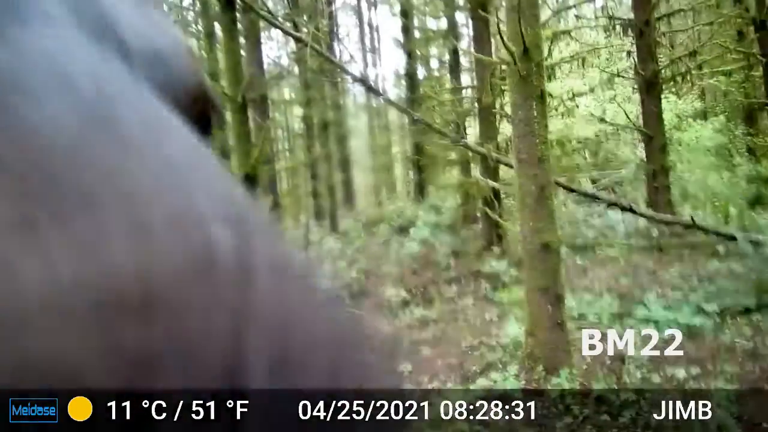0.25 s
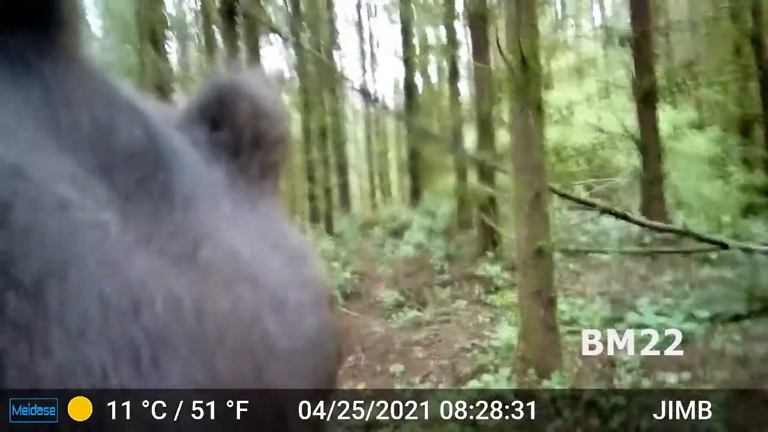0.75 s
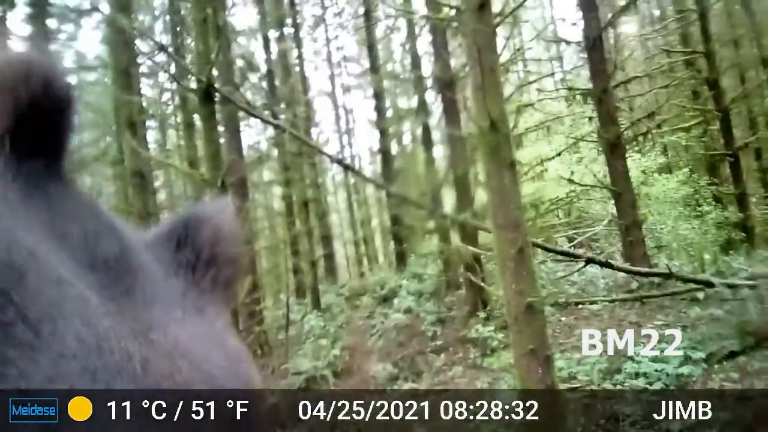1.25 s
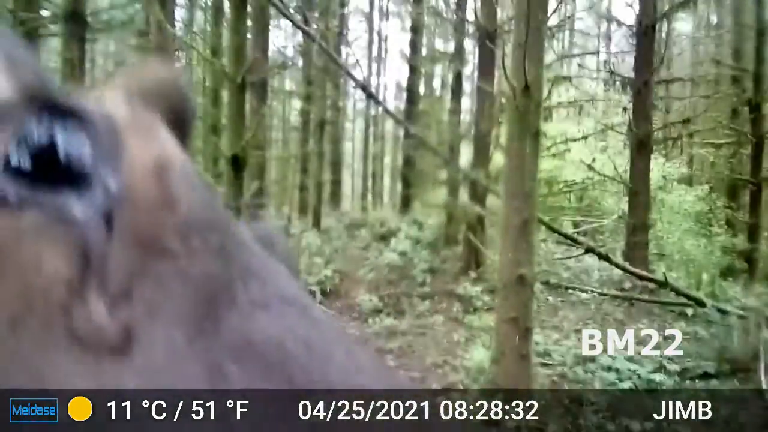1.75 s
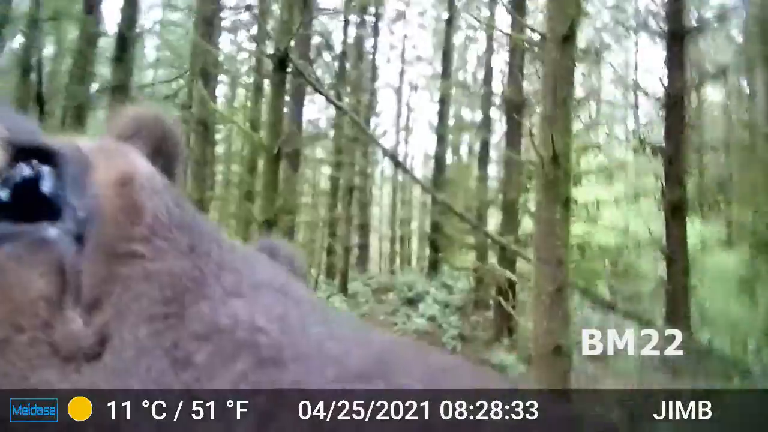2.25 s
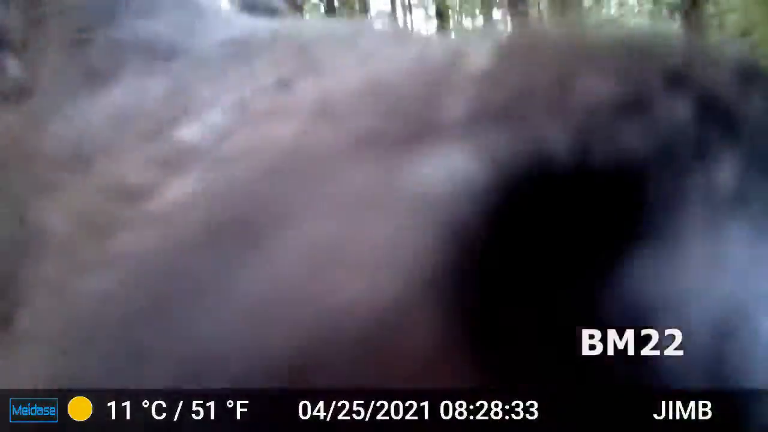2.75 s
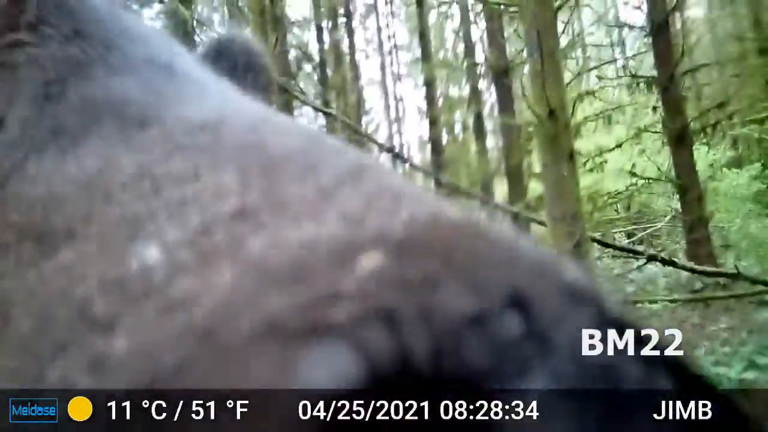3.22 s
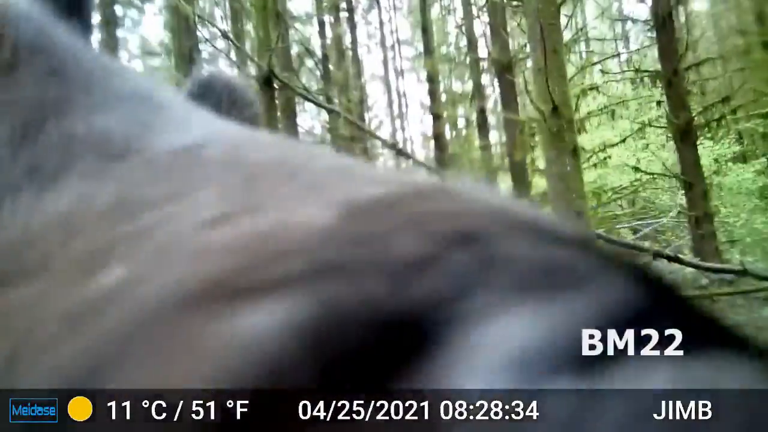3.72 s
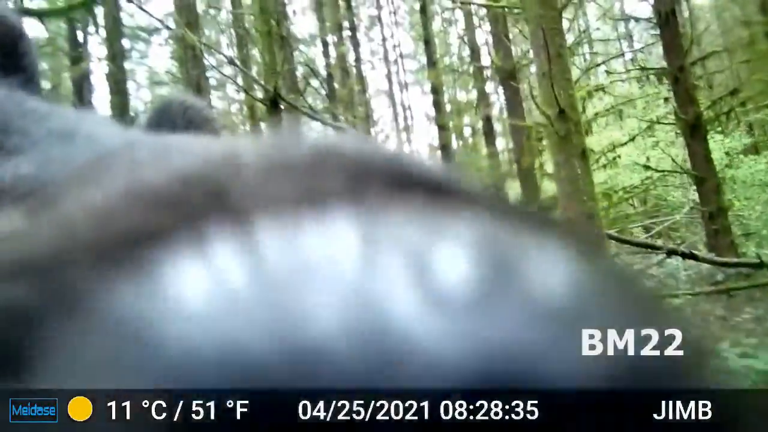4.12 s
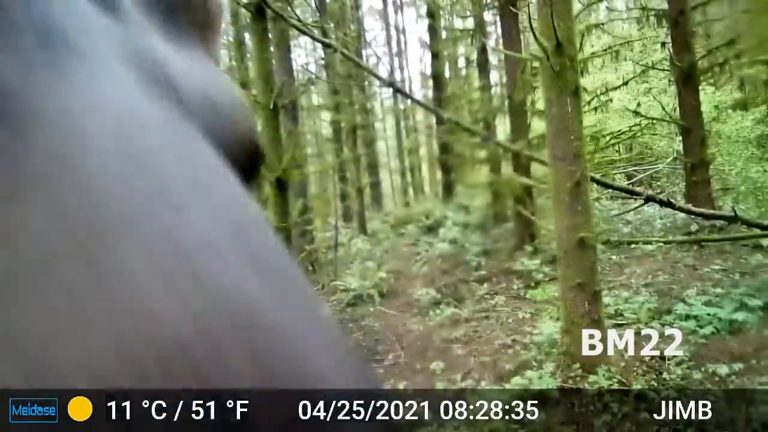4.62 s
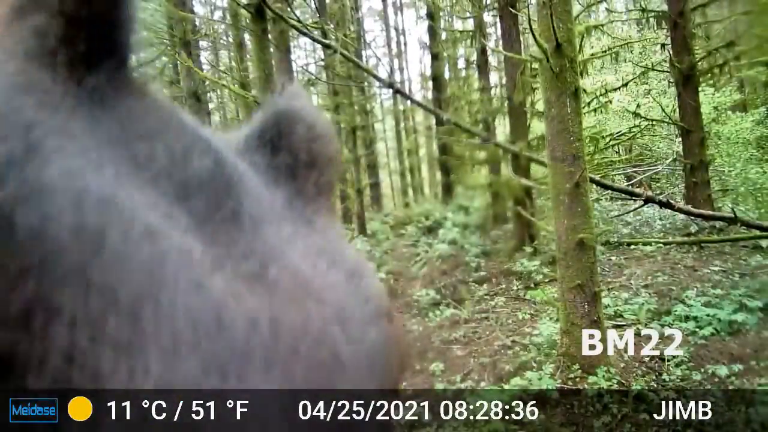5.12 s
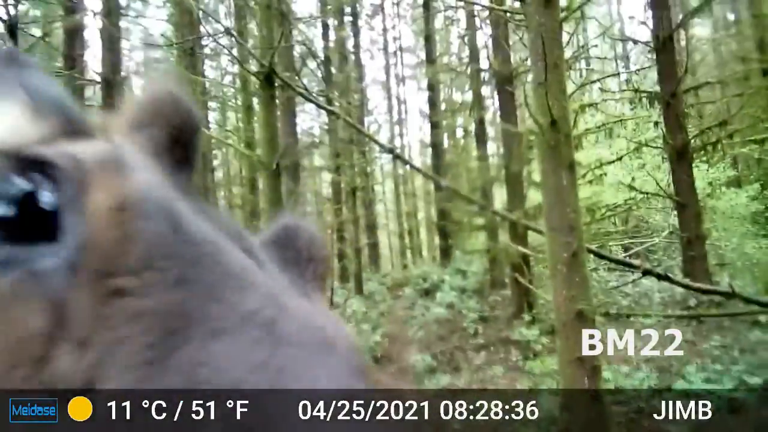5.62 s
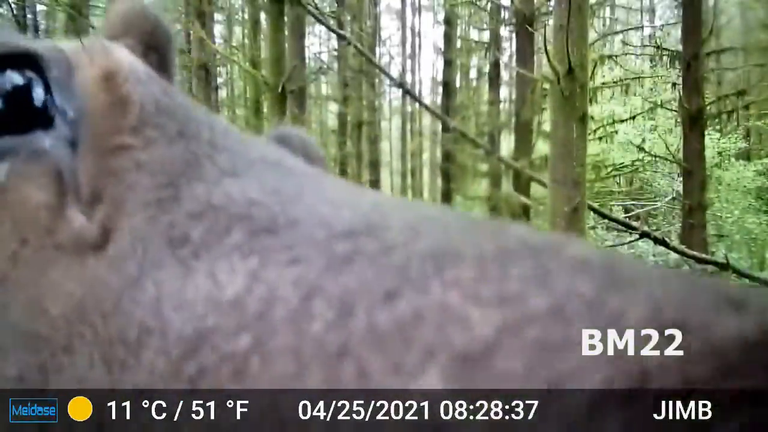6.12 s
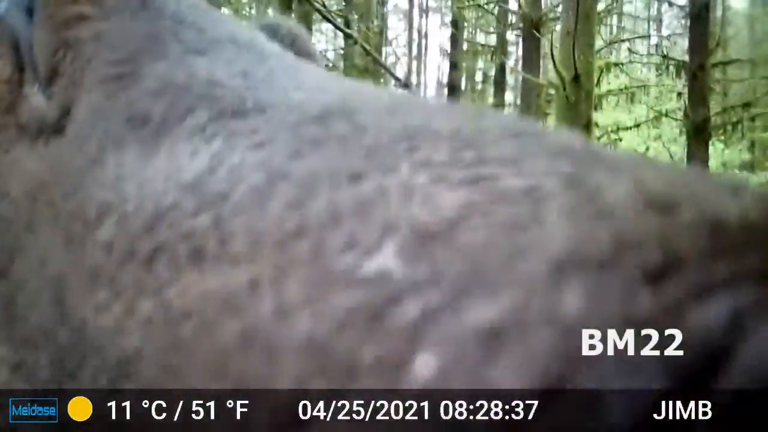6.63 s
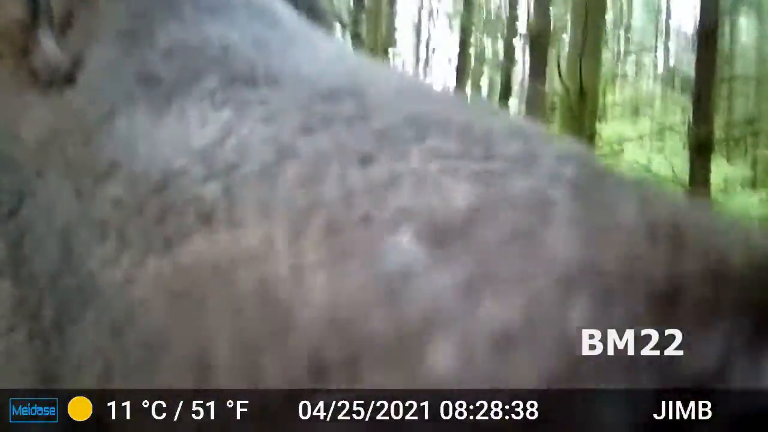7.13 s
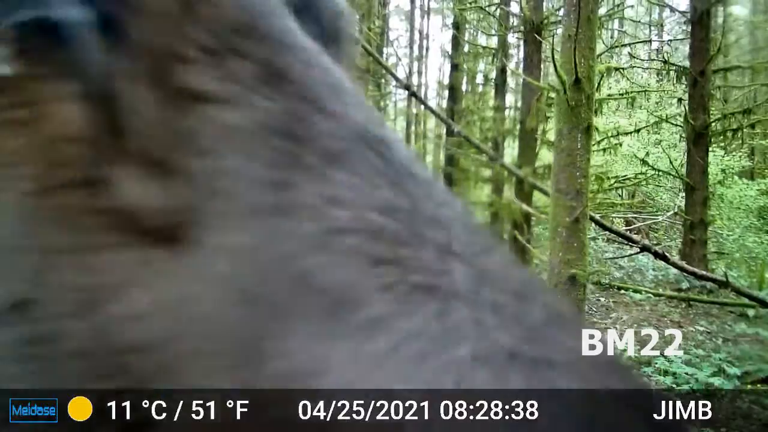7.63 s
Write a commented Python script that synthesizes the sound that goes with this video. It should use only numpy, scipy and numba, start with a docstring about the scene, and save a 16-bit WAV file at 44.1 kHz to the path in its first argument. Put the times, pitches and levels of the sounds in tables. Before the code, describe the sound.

Very close, dry contact noise in a quiet forest, as an elk rubs a plastic case. At 0 s a low thump and tiny puff, then a scrape with a short rising squeak around 0.1 s. Light fur strokes follow, with a double bump near 0.6 s and fuller hissing from 1.05 s. A brief squeak at 1.45 s leads to knocks, catches and clicks through 2.5 s. From 2.5 to 3.1 s, abrupt muzzle gusts roar and overload the microphone. Juddering scuffs, bumps and plastic ticks crowd 3.2-4.3 s. It thins, then dry bristly rubbing runs 5.2-5.7 s, ending in a thud and clicks. More thumps, rasps and ticks come from 6.1 to 7.1 s, heaviest near 6.4 and 6.9, with faint airy gusting behind and a thin bright whisk or two. After 7.2 s almost only faint forest air remains.

```python
"""A low thump and a puff of air, then an elk rubs its head on a trail camera in a quiet forest.
Fur hisses in strokes of dense hair clicks ringing the housing; fur catches judder and damp skin squeaks.
Muzzle gusts are noise under a moving corner; the dragged case rumbles, bumps rock it, its mount clicks.
Rare swishes are narrow bright hiss. Microphone and preamp saturate on the hard contacts.
"""
import sys
import numpy as np
from scipy import signal
from scipy.fft import rfft, irfft, next_fast_len
from scipy.io import wavfile
from scipy.ndimage import uniform_filter1d
from numba import njit

SR = 44100
rng = np.random.default_rng(int(sys.argv[2]) if len(sys.argv) > 2 else 0)


def master_out(mix):
    """Clip the mix to full scale and print it as 16-bit PCM to the path in sys.argv[1]."""
    frames = np.transpose(np.atleast_2d(mix))
    ceiling = np.clip(frames, -1, 1)
    pcm = np.round(ceiling * 32767).astype(np.int16)
    wavfile.write(sys.argv[1], SR, pcm)


N = 347067
TIME = np.arange(N) / SR  # s

# All table levels are relative.
# faint forest air, spectrum: freq_hz, level_db
FOREST_SPECTRUM = [(45, 8), (110, -7), (300, -18), (1000, -24.5), (2000, -31), (5000, -30), (8000, -42)]
FOREST_DB = -46.5
# rumble of the case on its strap, spectrum: freq_hz, level_db
SWAY_SPECTRUM = [(14, -16), (32, 4), (88, 3.5), (125, -4), (180, -19.5), (420, -63)]
# head leans on the case and shifts it: start_s, length_s, rumble_db
SHOVES = [(0.0, 0.018, -0.5), (0.663, 0.3, -27.5), (1.51, 0.16, -23.5), (2.148, 0.077, -18),
          (3.378, 0.04, -10.5), (4.146, 0.073, -17), (4.293, 0.075, -12), (4.745, 0.38, -30.5),
          (5.645, 0.14, -19.5), (6.367, 0.12, -19.5), (6.878, 0.049, -11)]
SHOVE_ATTACK_S, SHOVE_RELEASE_S = 0.003, 0.023
DRAG_DB, DRAG_GROWTH = -15, 0.48  # rumble under a stroke of gain 1; dB of rumble per dB of hiss
# muzzle gusts on the microphone port: start_s, length_s, level_db, base_corner_hz
GUSTS = [(0.006, 0.018, 1, 380), (2.532, 0.054, 9, 674), (2.639, 0.016, 6, 707), (2.666, 0.022, 3, 617),
         (2.707, 0.053, -4.5, 576), (2.758, 0.18, -9.5, 327.5), (2.877, 0.033, -6.5, 621),
         (2.958, 0.049, -8, 800), (3.023, 0.047, -6.5, 240), (3.09, 0.059, -3, 180),
         (6.402, 0.44, -29.5, 1148)]
GUST_ATTACK_S, GUST_RELEASE_S = 0.0015, 0.006
GUST_SAG_DB = -6
# coarse fur catches and judders: start_s, length_s, body_db, rasp_db
CATCHES = [(0.034, 0.01, -3, -15), (0.14, 0.0099, -36.5, -23), (0.612, 0.0081, -11, -24.5),
           (1.041, 0.016, -24, -44), (1.581, 0.029, -5.5, -14), (1.843, 0.0031, -9, -14),
           (1.939, 0.0089, -13, -22), (2.049, 0.0072, -19, -22.5), (2.179, 0.009, -8, -9),
           (2.201, 0.006, -11, -14), (2.22, 0.008, -18, -21), (2.446, 0.011, -3.5, -7.5),
           (2.479, 0.014, -25, -26.5), (2.513, 0.005, -3.5, -24.5), (2.841, 0.033, -15, -23.5),
           (3.159, 0.012, -13.5, -15), (3.215, 0.0071, -6, -15.5), (3.379, 0.027, -17.5, -61),
           (3.417, 0.021, -23, -25), (3.649, 0.0093, -21, -32.5), (3.706, 0.055, -19, -26),
           (3.885, 0.014, -27, -37), (3.958, 0.0098, -10, -45), (4.027, 0.005, -9.5, -35),
           (4.066, 0.0027, -4.5, -21), (4.138, 0.008, -2.5, -10), (4.204, 0.006, -14.5, -18),
           (4.311, 0.017, -20, -24.5), (5.651, 0.012, -16, -28), (5.689, 0.0094, -19.5, -30),
           (5.741, 0.017, -22, -43), (6.286, 0.0081, -6, -11), (6.344, 0.012, -12.5, -12.5),
           (6.411, 0.028, -14, -19.5), (6.711, 0.027, -15.5, -22.5), (6.86, 0.037, -1, -7),
           (6.908, 0.016, 2.5, -10)]
# damp skin squeaks on the plastic, one glide each: time_s, mean_pitch_hz, level_db
SQUEAKS = [
    [(.037, 1072, -39), (.062, 1109, -23), (.072, 1129, -8), (.093, 1043, -5.5), (.099, 1452, -22),
     (.127, 1614, -12)],
    [(1.434, 1103, -12), (1.446, 1095, -18.5), (1.456, 2235, -13.5), (1.474, 2880, -24)],
]
# strokes of fur over the case: start_s, length_s, hiss_and_sheen_db, swell_start_to_end_db,
# body_re_hiss_and_sheen_db, sheen_re_hiss_db
STROKES = [(0.045, 0.14, -28, -10.5, 4, 1), (0.353, 0.1, -33, 7, -3.5, 0),
           (0.645, 0.06, -35, -6.5, 4, -3.5), (0.867, 0.12, -37.5, 5, -2.5, 0.5),
           (1.053, .25, -25.5, 6, -3.5, -3), (1.337, 0.22, -29.5, 2, -2.5, -0.5),
           (1.644, 0.19, -54, -21.5, 3.5, 3), (1.846, 0.14, -40, 0.5, 4, 1), (2.085, 0.086, -35, 7, 4, 10),
           (2.175, 0.31, -30.5, -3.5, 1.5, 2.5), (2.562, 0.48, -40, -23, 3, -2.5),
           (3.197, 0.27, -33, 3, 1.5, 4.5), (3.492, 0.11, -33, 10.5, 3, -4),
           (3.662, 0.27, -39.5, -6.5, 6.5, 4), (4.059, 0.12, -30, 3, 7.5, -4),
           (4.235, 0.15, -27.5, 1.5, -3.5, 10), (4.416, 0.087, -35.5, -3.5, -3, 7),
           (4.527, 0.028, -37.5, 6.5, -2.5, -3), (4.827, 0.059, -29.5, 4.5, -1, -1),
           (4.922, 0.073, -44, 5, -6.5, 6), (5.027, 0.0096, -35, 0.5, -9, 6),
           (5.193, 0.21, -31, -3.5, -7, -2.5), (5.311, 0.13, -25, -0.5, -7, 4),
           (5.471, 0.27, -29.5, -1, -5, 2.5), (5.806, 0.17, -36.5, 5, -2, 5), (6.073, 0.04, -42, 4, 5, -3),
           (6.172, 0.19, -33.5, 1, 1.5, 4.5), (6.396, 0.315, -28.5, -7, 1.5, -4.5),
           (6.744, .19, -30.5, 6.5, 2.5, -6), (6.994, 0.084, -34, -1, 8.5, -11),
           (7.148, 0.07, -32.5, -9.5, -1.5, 6), (7.386, 0.086, -52, -2, 3, 0.5)]
STROKE_ATTACK_S, STROKE_RELEASE_S = 0.019, 0.014
# head bumps the case: start_s, level_db
BUMPS = [(0.604, -0.5), (0.646, -8), (1.027, -7.5), (1.582, -0.5), (1.931, 2.5), (2.192, -6.5), (3.21, 0.5),
         (3.575, -6.5), (4.146, 1.5), (4.204, 0), (4.298, -14), (5.64, 2.5), (5.656, -13), (6.089, -13),
         (6.241, -18), (6.394, 6.5), (6.727, -7), (7.047, -8.5)]
# case clicks against its mount: start_s, level_db
TICKS = [(1.845, -2), (2.2207, -4), (2.366, -29), (2.513, 6), (2.846, 4), (3.377, 0.5), (4.137, 8),
         (4.206, -4.5), (5.658, -9), (5.674, -7), (5.6845, 5), (5.809, -21), (7.057, -15), (6.0815, 1.5),
         (6.292, -6.5), (6.715, 6)]
# fine hair whisks past the port: start_s, length_s, level_db
SWISHES = [(3.722, 0.035, -21), (6.821, .035, -27.5), (7.161, 0.051, -20.5)]
# resonances of the housing and its port: mean_centre_hz, width_hz, mean_level_db
HOUSING_MODES = [(425, 78, 0.5), (690, 190, 5.5), (1024, 140, 10.5), (2175, 270, 8.5), (2815, 310, 3.5),
                 (3180, 250, 12), (4746, 230, 10.5)]
TOP_HZ = 7900


def undb(db):
    """Decibels to gain."""
    return 10 ** (np.asarray(db) / 20)


def unit(x):
    """Scale to rms 1."""
    return x / np.sqrt(np.mean(x ** 2) + 1e-18)


def curves(table):
    """Table columns after the first, joined by straight lines in time."""
    times_s, *columns = np.transpose(table)
    return [np.interp(TIME, times_s, column) for column in columns]


def add(out, start_s, x):
    """Mix x into out at start_s."""
    i = max(int(start_s * SR), 0)
    out[i:i + len(x)] += x[:N - i]


def band(x, hz, kind, order=2):
    """Causal low-, high- or band-pass."""
    sos = signal.butter(order, hz, kind, fs=SR, output="sos")
    return signal.sosfilt(sos, x + 1e-18)


def split(x, hz):
    """Zero-phase low part and its remainder; they sum to the whole."""
    low = signal.sosfiltfilt(signal.butter(3, hz, fs=SR, output="sos"), x)
    return low, x - low


def noise(spectrum):
    """Gaussian noise of rms 1, shaped to freq_hz, level_db points."""
    freq_hz, level_db = np.transpose(spectrum)
    size = next_fast_len(N)
    bins_hz = np.fft.rfftfreq(size, 1 / SR)
    gain = undb(np.interp(np.log(bins_hz + 1), np.log(freq_hz), level_db))
    return unit(irfft(rfft(rng.standard_normal(size)) * gain, size)[:N])


def walk(rate_hz):
    """Random line of rms about 1, a new target rate_hz times a second."""
    targets = rng.standard_normal(N // 10)
    return np.interp(TIME * rate_hz, np.arange(len(targets)), targets) * np.sqrt(3 / 2)


@njit
def sweep(x, hz, damping):
    """State-variable filter whose corner moves every sample: rows low-pass and band-pass."""
    y, b, l = np.empty((2, len(x))), 0., 0.
    for i in range(len(x)):
        g = np.tan(np.pi * hz[i] / SR)
        v = (b + g * (x[i] - l)) / (1 + g * (g + damping))
        y[0, i], y[1, i] = l + g * v, damping * v
        b, l = 2 * v - b, l + 2 * g * v
    return y


def contact(start_s, length_s, attack_s, release_s, swell_db=0):
    """Gain of one touch: grows until start_s, holds while swelling or sagging, then dies away."""
    before = np.maximum(start_s - TIME, 0) / attack_s
    after = np.maximum(TIME - start_s - length_s, 0) / release_s
    progress = np.clip((TIME - start_s) / length_s, 0, 1) - .5
    return np.exp(swell_db * progress * np.log(10) / 20 - np.minimum(before + after, 20))


def hairs(rate_hz, spread_db):
    """Hairs flicking off an edge: random clicks; positive spread_db makes a few much larger."""
    flicks = rng.random(N) < rate_hz / SR
    size_db = spread_db * np.minimum(rng.exponential(size=N), 5)
    return unit(flicks * rng.standard_normal(N) * undb(size_db))


def housing(x, direct, shift_db):
    """Case modes ring, their shares and tuning drifting as the contact travels; some sound goes direct."""
    out = direct * x
    for hz, width_hz, db in HOUSING_MODES:
        centre_hz = hz * (1 + .018 * walk(17))
        share = undb(db + shift_db * walk(13))
        out = out + share * sweep(x + 1e-18, centre_hz, width_hz / hz)[1]
    # reflection off the hide across a changing gap: moving notches
    lag_samples = .0006 * SR * np.exp(.3 * walk(9))
    reflection = np.interp(np.arange(N) - lag_samples, np.arange(N), out)
    return out + .4 * reflection


def forest_air():
    """Faint steady air of the forest: shaped noise."""
    return undb(FOREST_DB) * noise(FOREST_SPECTRUM)


def dragging(friction, lurch_db=0.5):
    """Skin drags the case on its strap in small lurches: a rumble under strokes, plus leaning shoves."""
    power = (undb(DRAG_DB) * friction ** DRAG_GROWTH) ** 2
    for start_s, length_s, db in SHOVES:
        shove = undb(db) * contact(start_s, length_s, SHOVE_ATTACK_S, SHOVE_RELEASE_S)
        power = power + shove ** 2
    rumble = unit(noise(SWAY_SPECTRUM) * undb(lurch_db * walk(16)))
    return np.sqrt(power) * rumble


def air(gust_db=0.0, damping=1.0, reach=1.42, port_hz=70, flick_db=-26, flick_hz=550):
    """Eddies hit the port in abrupt gusts; each surge of flow raises level and noise corner together."""
    flows = [undb(db) * contact(start_s, length_s, GUST_ATTACK_S, GUST_RELEASE_S, GUST_SAG_DB)
             for start_s, length_s, db, _ in GUSTS]
    flow = sum(flows)
    corner_hz = sum(f * hz for f, (*_, hz) in zip(flows, GUSTS)) / flow
    surge = np.clip(walk(130), -2, 1.5)
    corner_hz = np.minimum(corner_hz * np.exp(.22 * surge), SR / 16)
    eddies = sweep(rng.standard_normal(N), corner_hz * reach, damping)[0]
    eddies = sweep(eddies, corner_hz, 2.6)[0]
    roar = unit(band(eddies / np.sqrt(corner_hz), port_hz, "highpass"))
    # whiskers scrape the case, hardly at all where the corner is low
    scrape = housing(hairs(rate_hz=2500, spread_db=2), direct=1, shift_db=2)
    whiskers = unit(band(scrape, [600, 7000], "bandpass"))
    flicks = undb(flick_db) * np.minimum(corner_hz / flick_hz, 1) ** 4
    # the flow dips briefly as the lip covers the port
    lip_db = -7 * np.maximum(walk(90), 0) ** 2
    flutter = undb(3.5 * surge + lip_db + 2)
    return (roar + flicks * whiskers) * flow * flutter * undb(gust_db)


def catches(release_s=0.0039, body_db=2.0, rasp_db=4.5, snap=5):
    """Stick and slip: a catch lets go with a snap and judders in uneven jerks, each dragging hairs."""
    jerks = hairs(rate_hz=9700, spread_db=4) * undb(2.5 * walk(520))
    push, rasp = np.zeros(N), np.zeros(N)
    rise_s = .004
    t = TIME[:SR // 5]
    for start_s, length_s, low_db, high_db in CATCHES:
        rise = np.minimum(t / rise_s, 1)
        after_s = np.maximum(t - length_s, 0)
        add(jerks, start_s + rise_s, np.array([snap]))
        add(push, start_s, undb(low_db + body_db) * rise * np.exp(-after_s / (2 * release_s)))
        add(rasp, start_s, undb(high_db + rasp_db) * rise * np.exp(-after_s / release_s))
    ring = housing(jerks, direct=0.8, shift_db=0.0)
    body = unit(band(ring, [260, 1550], "bandpass", order=3))
    edge = band(ring, 910, "highpass", order=3)
    edge = unit(band(edge, 4200, "lowpass", order=1))
    return push * body + rasp * edge


def squeaks(rasp_db=-4):
    """Slips fall into step: an unsteady gliding tone, each slip rasping through the case."""
    waver = 1 + .08 * walk(900)
    tone, slips = 0, 0
    for table in SQUEAKS:
        pitch_hz, db = curves(table)
        phase = 2 * np.pi * np.cumsum(pitch_hz * waver) / SR
        active = (TIME > table[0][0]) & (TIME < table[-1][0])
        gain = uniform_filter1d(1. * active, SR // 300) * undb(db)
        tone = tone + gain * np.sin(phase)
        slips = slips + gain * np.exp(8 * (np.cos(phase) - 1))  # one pulse a cycle
    ring = housing(slips * (1 + rng.standard_normal(N)), direct=.5, shift_db=1)
    rasp = band(ring, 1400, "highpass")
    return tone * undb(2.5 * walk(400)) + 2 * undb(rasp_db) * rasp


def strokes():
    """Body, hiss and sheen gains of the fur; overlapping strokes add in power."""
    power = np.zeros((3, N))
    for start_s, length_s, db, swell_db, body_db, sheen_db in STROKES:
        bright = undb(sheen_db)
        total = np.hypot(1, bright)
        shares = undb(db) * np.array([undb(body_db), 1 / total, bright / total])
        touch = contact(start_s, length_s, STROKE_ATTACK_S, STROKE_RELEASE_S, swell_db)
        power += np.outer(shares ** 2, touch ** 2)
    return np.sqrt(power)


def rubbing(body_gain, hiss_gain, sheen_gain, thrum_db=-10, firm_db=-28, soft_hz=5500):
    """Fur slides in uneven tufts; light strokes ring the case hollow, firm ones damp its modes and flex it."""
    pressure = np.minimum(body_gain / undb(firm_db), 1)
    tufts = undb(walk(14) + walk(45) + 1.6 * walk(260))
    scratch = hairs(rate_hz=11000, spread_db=-1.0) * tufts
    ring = housing(scratch * (1 - .4 * pressure), direct=.25, shift_db=2.5)
    ring = ring + 1.6 * pressure ** 2 * scratch
    body, treble = split(band(ring, 520, "highpass", order=3), 1600)
    hiss, sheen = split(treble, 3930)
    sheen = band(sheen, soft_hz, "lowpass", order=1)
    thrum = unit(band(scratch, [190, 480], "bandpass", order=3) * tufts)
    thrum = thrum * undb(thrum_db) * pressure
    return body_gain * (unit(body) + thrum) + hiss_gain * unit(hiss) + sheen_gain * unit(sheen)


def bumps(sway_hz=72, decay_s=0.012, knock_hz=160, knock=0.29, knock_s=0.018, gain_db=4):
    """Soft blows: each rocks the case in a fast-decaying sine, with a brief dull noise knock on top."""
    out, t = np.zeros(N), TIME[:SR // 6]
    knock_band_hz = [knock_hz / 1.5, knock_hz * 1.5]
    dull = unit(band(rng.standard_normal(N), knock_band_hz, "bandpass"))
    for (start_s, db), detune in zip(BUMPS, rng.standard_normal(len(BUMPS))):
        rock_hz = sway_hz * np.exp(0.22 * detune)
        rock = np.sin(2 * np.pi * rock_hz * t) * np.exp(-t / decay_s)
        thud = dull[int(start_s * SR):][:len(t)] * np.exp(-t / knock_s)
        rise = np.minimum(t / 0.007, 1)
        add(out, start_s, undb(db + gain_db) * rise * (rock + knock * thud))
    return out


def ticks(decay_s=0.0012, edge_hz=1900):
    """Hard plastic contacts: noise cracks of a few milliseconds ring the upper modes."""
    cracks, t = np.zeros(N), TIME[:SR // 50]
    for start_s, db in TICKS:
        add(cracks, start_s, undb(db) * np.exp(-t / decay_s) * rng.standard_normal(len(t)))
    ring = housing(cracks, direct=.5, shift_db=1)
    return band(ring, edge_hz, "highpass")


def swishes(attack_s=0.0071, release_s=0.0062, low_hz=4500, high_hz=6700):
    """Quick, light brush of fine hair: a narrow band of bright hiss that stops short."""
    brush = housing(hairs(rate_hz=47000, spread_db=0), direct=1, shift_db=3)
    whisk = unit(band(brush, [low_hz, high_hz], "bandpass", order=3))
    gain = sum(undb(db) * contact(start_s, length_s, attack_s, release_s)
               for start_s, length_s, db in SWISHES)
    return whisk * gain


def saturate(x, ceiling, order):
    """Round peaks off under a ceiling; a higher order gives a harder knee."""
    return x / (1 + np.abs(x / ceiling) ** order) ** (1 / order)


def scene():
    """All contacts at the microphone, over the faint air of the forest."""
    body, hiss, sheen = strokes()
    fur = rubbing(body, hiss, sheen) + swishes()
    drag = dragging(np.hypot(hiss, sheen))
    contacts = fur + drag + catches() + ticks() + bumps() + squeaks()
    return (contacts + air() + forest_air())[None]


def record(dry, ceiling=0.5, coupling_hz=36):
    """Big low swings saturate the microphone and choke the hiss; the preamp cuts deep bass and limits."""
    coupled = band(saturate(dry, ceiling, order=4), coupling_hz, "highpass")
    limited = saturate(coupled, .76, order=8)
    top_cut = signal.firwin(61, TOP_HZ, window=("kaiser", 1.2), fs=SR)
    return signal.convolve(limited, top_cut[None], "same")


dry = scene()
out = record(dry)
master_out(out)
```